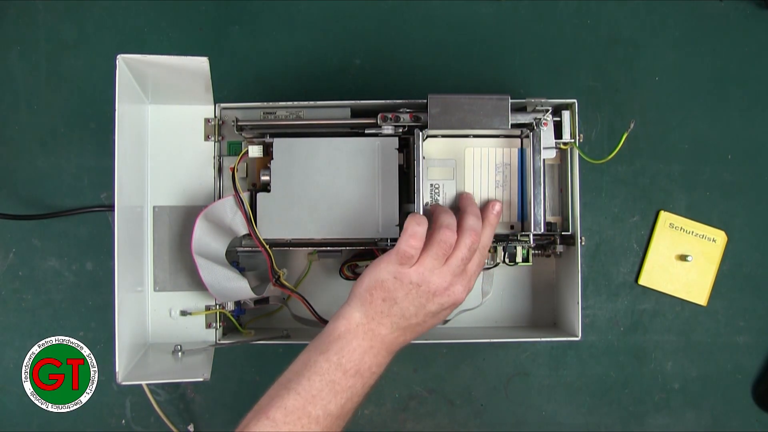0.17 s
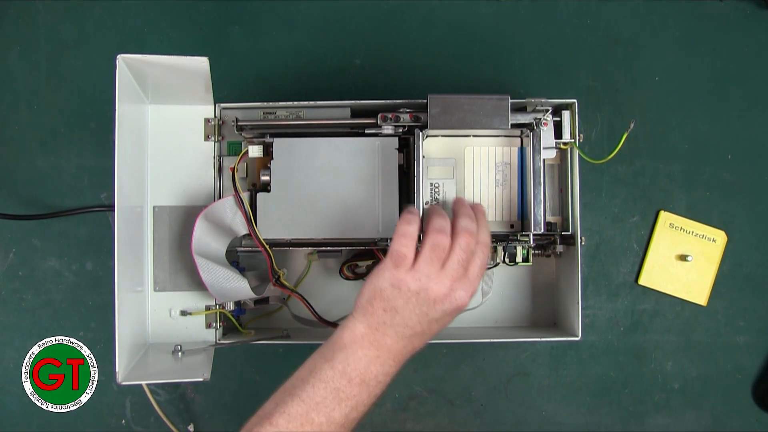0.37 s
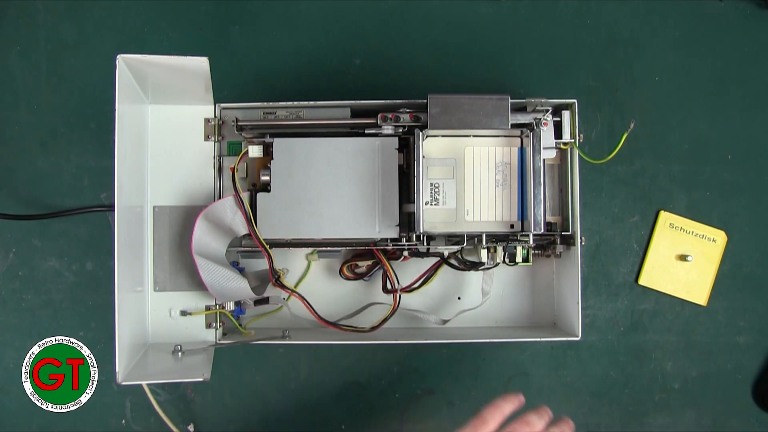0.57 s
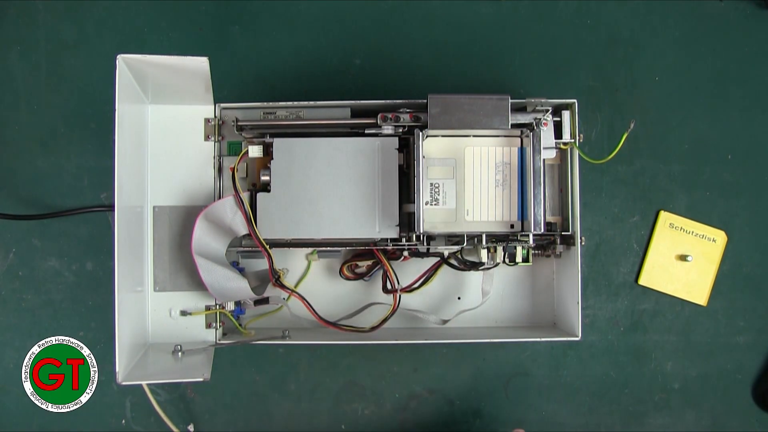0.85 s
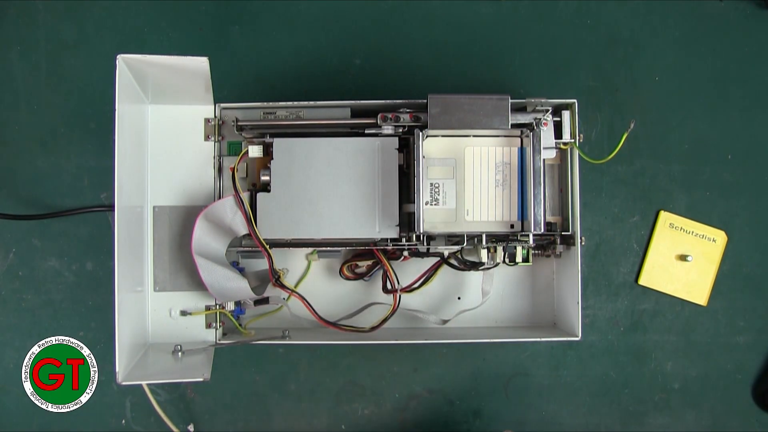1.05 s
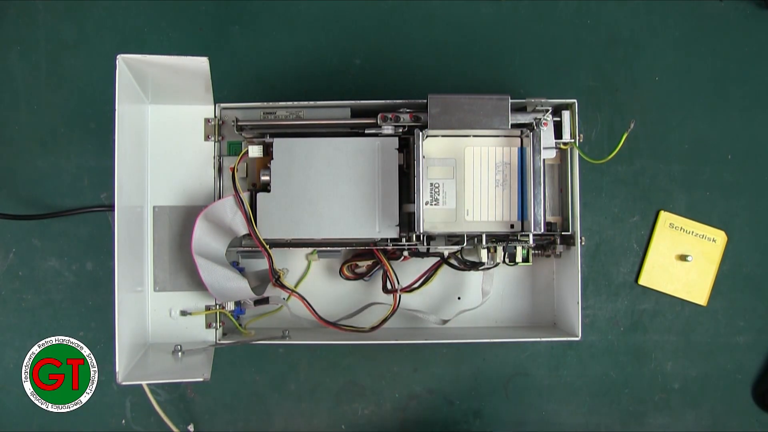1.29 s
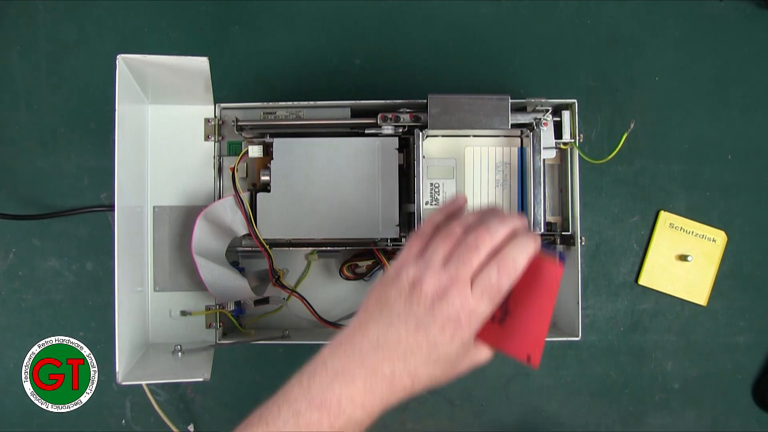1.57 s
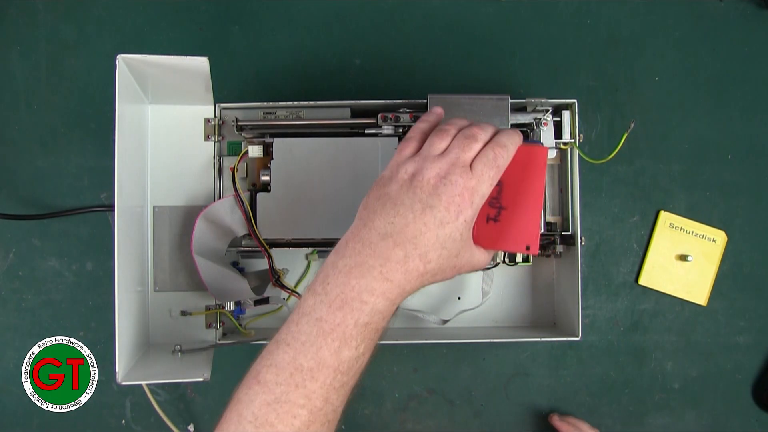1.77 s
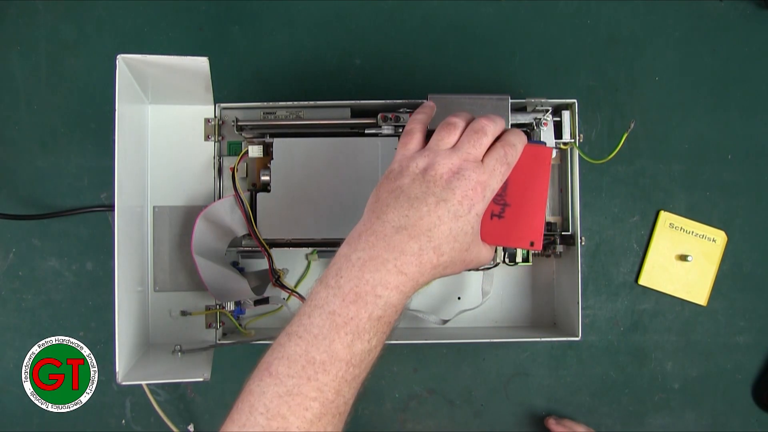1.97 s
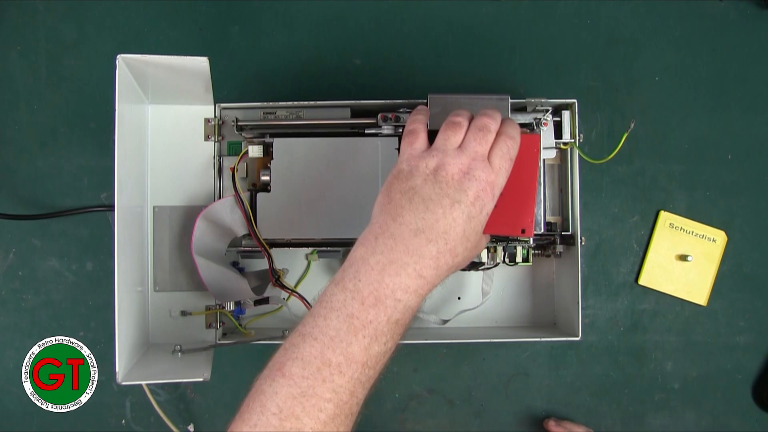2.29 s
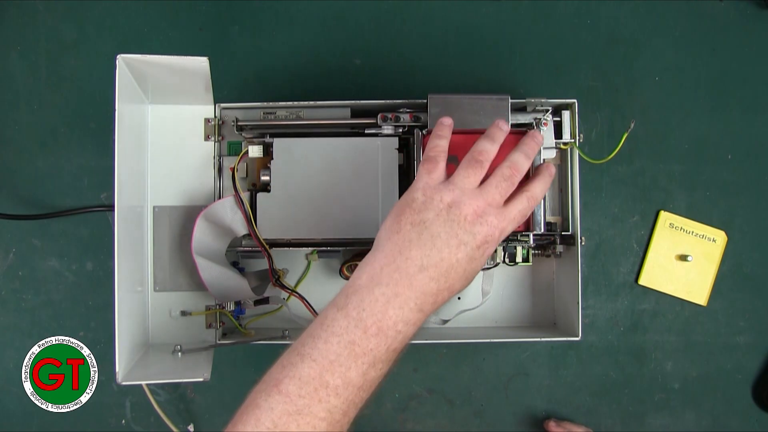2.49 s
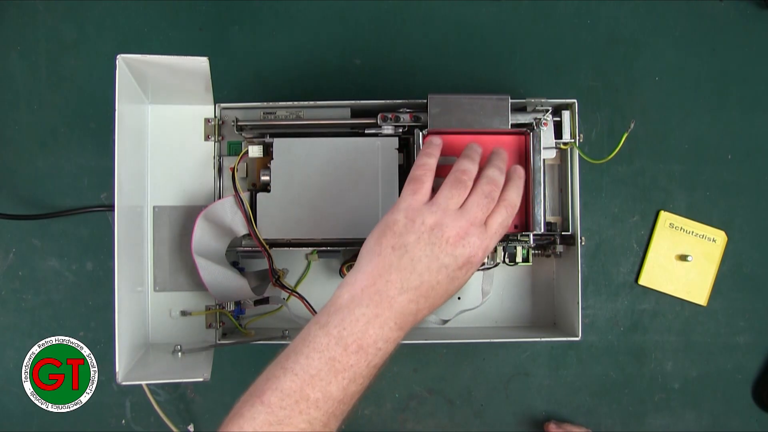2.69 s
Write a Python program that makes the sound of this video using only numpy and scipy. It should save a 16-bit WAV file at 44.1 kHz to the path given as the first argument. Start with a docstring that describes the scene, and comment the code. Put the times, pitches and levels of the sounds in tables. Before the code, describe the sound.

Stacked floppy disks knock and slap down into a metal loader, soft plastic slides follow, then a second stack rattles in with many clacks and is pushed home; close microphone above a bench, faint hum.

```python
"""In a small quiet room, over mains hum and faint hiss, a stack of plastic floppy disks is nudged by hand.
After a few knocks and thin metal pings it drops into the metal magazine of a disk loader with a slap;
a faint rising ring follows. Disks slide in grainy rubs as a second stack is picked up, which then clatters
in and is pressed home. Knocks are noise cracks with a ringing tail, shell rings and magazine modes; filtered
noise makes slides and small contacts; decaying low sines and a dull noise thud thump the bench."""
import sys
import numpy as np
from scipy import signal
from scipy.fft import rfft, irfft
from scipy.io import wavfile

SR = 44100
rng = np.random.default_rng(int(sys.argv[2]) if len(sys.argv) > 2 else 0)


def transcribe(u):
    """Save the signal u as a 16-bit wav file named by the first command-line argument.

    u: samples, shape (n,) or (channels, n), limited to [-1, 1]; the rate is SR.
    q: integer samples, one column per channel.
    """
    v = np.clip(np.atleast_2d(u).T, -1, 1)
    q = np.round(v * 32767).astype(np.int16)
    wavfile.write(sys.argv[1], SR, q)


N = 125685
CLOCK = np.arange(N) / SR  # s, the whole scene
T = np.arange(21600) / SR  # s since the start of one short sound


def amp(db):
    """Decibels to gain."""
    return 10 ** (np.asarray(db) / 20)


def unit(x):
    """Scales to rms 1."""
    return x / np.sqrt(np.mean(x ** 2) + 1e-20)


def read(points, hz):
    """Reads a table on a log-frequency axis."""
    f, value = np.transpose(points)
    return np.interp(np.log(hz + 1), np.log(f + 1), value)


def add(mix, s, sound):
    """Mixes a sound in at time s."""
    part = mix[max(round(s * SR), 0):][:len(sound)]
    part += sound[:len(part)]


def fade(t60, t=T):
    """Exponential decay by 60 dB in t60 seconds."""
    return np.exp(-np.log(1000) * t / t60)


def swing(hz):
    """A steady sine over the length of one short sound."""
    return np.sin(2 * np.pi * hz * T)


def colour(x, db_at, size=2048):
    """Causal minimum-phase filter with the gain db_at(Hz)."""
    hz = abs(np.fft.fftfreq(size, 1 / SR))
    log_gain = np.log(amp(db_at(hz)) + 1e-6)
    # The Hilbert transform of the log gain gives the minimum phase
    spectrum = np.exp(np.conj(signal.hilbert(log_gain)))
    taps = np.fft.ifft(spectrum).real
    return signal.fftconvolve(x, taps)[:len(x)]


def shaped(x, points, size=2048):
    """Colours white sound by a spectrum, keeping its power."""
    power = np.mean(amp(read(points, np.fft.rfftfreq(size, 1 / SR))) ** 2)
    return colour(x, lambda hz: read(points, hz) - 10 * np.log10(power))


def band(length, hz, width_hz):
    """Noise of rms 1 in one resonance."""
    f = np.fft.rfftfreq(length, 1 / SR)
    resonance = 1 / (1 + ((f - hz) / (width_hz / 2)) ** 2)
    return unit(irfft(rfft(rng.standard_normal(length)) * resonance, length))


# Ring-out of the case and the room. Each row: frequency in Hz, decay by 60 dB in seconds.
RING_OUT = [(100, 0.3), (600, 0.29), (1500, 0.17), (3300, 0.18), (6000, 0.2), (12000, 0.21), (16000, 0.18)]
TAIL_RISE_S = 0.0019  # the tail swells behind the crack
LATE_DB, LATE_T60_S, LATE_TOP_HZ = -32, .7, 3960  # faint long ring of the metalwork


def ring_out(size=256):
    """Dense reflections as noise, each band dying at its own speed."""
    hz, t, noise = signal.stft(rng.standard_normal(len(T)), SR, nperseg=size)
    early = fade(read(RING_OUT, hz)[:, None], t)
    late = amp(LATE_DB) * fade(LATE_T60_S, t) / (1 + (hz[:, None] / LATE_TOP_HZ) ** 6)
    tail = signal.istft(noise * (early + late), SR, nperseg=size)[1][:len(T)]
    return tail * (1 - np.exp(-T / TAIL_RISE_S))


# Mains hum. Each row: frequency in Hz, level in dB rms.
HUM = [(50, -64.5), (150, -77.5)]
# Colour of the room hiss. Each row: frequency in Hz, relative level in dB.
AIR = [(20, 6.5), (60, 1), (120, -7.5), (300, -15.5), (640, -13), (2000, -19.5), (3800, -20), (5000, -24),
       (12000, -30), (16000, -40.5)]
AIR_DB = -71.5  # rms


def background():
    """Mains hum as steady sines and the hiss of the room as coloured noise."""
    out = amp(AIR_DB) * unit(shaped(rng.standard_normal(N), AIR))
    for hz, db in HUM:
        phase = 2 * np.pi * (hz * CLOCK + rng.random())
        out += amp(db) * np.sqrt(2) * np.sin(phase)
    return out


# Faint thin ring after the hand lets go.
# Each row: frequency in Hz at the top of the swell, width in Hz, level in dB.
FRAME = [(1595, 216, -66), (2705, 2500, -70), (4840, 350, -81)]
FRAME_AT_S, FRAME_SWELL_S, GLIDE_HZ_PER_S = .56, .065, 1400


def frame():
    """Narrow and broad noise bands that swell, glide upward and fade as a faint thin ring."""
    since_peak = CLOCK - FRAME_AT_S
    swell = np.exp(-(since_peak / FRAME_SWELL_S) ** 2 / 2)
    ring = sum(amp(db) * band(N, hz, width) for hz, width, db in FRAME)
    # A rotating phase shifts every frequency by the same number of Hz
    glide = np.exp(1j * np.pi * GLIDE_HZ_PER_S * since_peak ** 2)
    return swell * (signal.hilbert(ring) * glide).real


# Slides of disk on disk.
# Each row: peak in seconds, rise and fall in seconds for a factor e, level at the peak in dB.
SLIDES = [(0.881, 0.022, 0.0045, -61.5), (0.950, 0.022, 0.018, -39), (1.225, 0.0085, 0.025, -68),
          (1.440, .012, .015, -65), (2.685, 0.052, 0.098, -62)]
# Colour of the rub. Each row: frequency in Hz, relative level in dB.
SLIDE_COLOUR = [(180, -94), (300, -53), (532, -29.5), (975, -15), (1910, -1.5), (2440, -13.5), (3270, 0),
                (4050, -11), (8190, -20), (15000, -43)]
SLIDE_GRAIN_DB, SLIDE_ROOM_DB = 3.5, -14


def slides():
    """Grainy friction of plastic on plastic, swelling and stopping."""
    level = np.zeros(N)
    for s, rise, fall, db in SLIDES:
        level += amp(db) * np.exp(-np.maximum((s - CLOCK) / rise, (CLOCK - s) / fall))
    bumps = np.minimum(rng.exponential(1, N), 5)
    grains = unit(rng.standard_normal(N) * amp(SLIDE_GRAIN_DB * bumps))
    rub = shaped(level * grains, SLIDE_COLOUR)
    room = ring_out()
    room /= np.linalg.norm(room)
    return rub + amp(SLIDE_ROOM_DB) * signal.fftconvolve(rub, room)[:N]


# Light ticks, a soft rustle and some duller small knocks, each in one resonance.
# Each row: start in seconds, level in dB, frequency in Hz, width in Hz.
SMALL_CONTACTS = [(0.102, -53.5, 7700, 1800), (0.183, -45, 3400, 600), (0.478, -56.5, 1512, 446),
                  (0.822, -62.5, 2940, 3000), (0.875, -37.5, 3440, 2580), (1.052, -60, 890, 345),
                  (1.150, -53.5, 1720, 300), (1.933, -46, 1300, 704), (2.369, -31.5, 1050, 600),
                  (2.742, -33, 766, 398)]
CONTACT_S, CONTACT_ROOM_DB = .003, -10  # decay by a factor e, level of the room's tail


def small_contacts():
    """Short dry noise bursts, each in one resonance with nothing far below it."""
    out = np.zeros(N)
    for s, db, hz, width in SMALL_CONTACTS:
        decay = np.exp(-T / CONTACT_S) + amp(CONTACT_ROOM_DB) * fade(read(RING_OUT, hz))
        rise = 1 - np.exp(-np.pi * width * T)  # a narrow resonance speaks more slowly
        contact = band(len(T), hz, width) * decay * rise
        low_cut = signal.butter(2, hz / np.sqrt(2), "high", fs=SR)
        add(out, s, amp(db) * signal.lfilter(*low_cut, contact))
    return out


# Thumps into the bench. Each row: start in seconds, level in dB.
THUMPS = [(0.0, -56), (0.136, -51.5), (0.230, -22), (1.848, -50), (2.094, -56.5), (2.257, -37),
          (2.353, -47.5), (2.456, -47), (2.515, -43.5), (2.789, -37)]
# Modes of the bench. Each row: frequency in Hz, level in dB, decay by 60 dB in seconds.
BENCH = [(81.6, 4, 0.26), (99.9, -3.5, 0.37), (190, -17.5, 0.42)]
# Dull thud of the case that goes with each thump. Each row: frequency in Hz, relative level in dB.
THUD = [(40, -14), (100, 0), (135, -12.5), (190, 3.5), (300, -15.5), (388, 1), (470, -11), (900, -28.5)]
THUMP_RISE_S, THUD_DB, THUD_T60_S = .012, -5.5, 0.17


def bench():
    """Heavy landings set the loader and the bench booming: low modes with a dull noise thud."""
    out = np.zeros(N)
    boom = sum(amp(db) * fade(t60) * swing(hz) for hz, db, t60 in BENCH)
    rise = 1 - np.exp(-T / THUMP_RISE_S)
    for s, db in THUMPS:
        noise = shaped(rng.standard_normal(len(T)), THUD, size=4096)
        thud = amp(THUD_DB) * noise * fade(THUD_T60_S)
        add(out, s, amp(db) * (boom + thud) * rise)
    return out


DETUNE = .012  # share of the frequency by which metal modes stray
# Pings of thin metal, such as shutters and springs.
# Each row: start in seconds, level in dB, frequency in Hz.
PINGS = [(0.137, -33, 1815), (0.147, -47, 8200), (0.208, -34.5, 3570)]
PING_T60_S = .2


def pings():
    """Thin metal parts, flicked in passing, buzz on as a cluster of close modes."""
    out = np.zeros(N)
    envelope = fade(PING_T60_S) * (1 - np.exp(-T / TAIL_RISE_S))
    for s, db, hz in PINGS:
        buzz = swing(hz) + .5 * band(len(T), hz, 2 * np.pi * DETUNE * hz)
        add(out, s, amp(db) * buzz * envelope)
    return out


SHELL_T60_S, SHELL_SPREAD = .085, .08  # decay at 1000 Hz, spread as a share of the pitch


def shell_ring(hz, count=6):
    """A struck disk shell: one main mode and weaker neighbours start together; higher rings die sooner."""
    near = hz * (1 + SHELL_SPREAD * rng.standard_normal((count, 1)))
    neighbours = rng.standard_normal(count) @ swing(near) / np.sqrt(count)
    dying = fade(SHELL_T60_S * np.sqrt(1000 / hz))
    return unit((swing(hz) + neighbours) * dying) * np.sqrt(np.mean(dying ** 2) / 2)


# Colour of the dense clack of plastic. Each row: frequency in Hz, relative level in dB.
CLACK = [(60, -42), (280, -21.5), (460, -13.5), (620, -1), (1100, 3.5), (1600, 0.5), (2500, 1.5), (3700, 2),
         (5000, -6), (7500, -14.5), (12000, -25), (16000, -37)]
CRACK_S, CRACK_RISE_S, TAIL_DB = 0.0044, 0.0009, -3.5  # the first crack dies fast
SAME_TAIL = 0.43  # share of the tail's power that all knocks have in common
RATTLE_DB, RATTLE_HZ, RATTLE_S = 2, 350, 0.051  # loose parts chatter just after each knock
LOW_CUT_HZ = 514  # small parts radiate little bass
TREBLE_HZ, BASS_HZ = 4900, 425  # corners of the tone controls


def knock_noise(room, linger_db):
    """A sharp crack and its dense tail, chattering in level and coloured as plastic."""
    crack = rng.standard_normal(len(T)) * np.exp(-T / CRACK_S) * (1 - np.exp(-T / CRACK_RISE_S))
    tail = np.sqrt(SAME_TAIL) * room + np.sqrt(1 - SAME_TAIL) * ring_out()
    smooth = crack + amp(TAIL_DB + linger_db) * tail
    chatter = amp(RATTLE_DB * band(len(T), 0, RATTLE_HZ) * np.exp(-T / RATTLE_S))
    return shaped(unit(smooth * chatter) * smooth.std(), CLACK)


def magazine_ring(modes):
    """The magazine's modes, struck with random signs and slightly uneven levels."""
    strikes = rng.choice([-1, 1], len(modes)) * amp(rng.normal(0, 1.0, len(modes)))
    # The shifting load detunes the modes
    return np.interp(T * rng.normal(1, DETUNE), T, strikes @ modes)


def knock(room, modes, level_db, treble_db, bass_db, magazine_db, shell_hz, shell_db, linger_db):
    """A chattering crack and its tail, the short ring of a disk shell and the magazine's modes."""
    clack = knock_noise(room, linger_db)
    magazine = amp(magazine_db + linger_db) * magazine_ring(modes)
    shell = amp(shell_db) * shell_ring(shell_hz)
    low_cut = signal.butter(6, LOW_CUT_HZ, "high", fs=SR, output="sos")
    rings = signal.sosfilt(low_cut, shell + magazine)

    def tone_db(hz):
        """Treble and bass shelves."""
        treble = treble_db * hz ** 2 / (hz ** 2 + TREBLE_HZ ** 2)
        return treble + bass_db / (1 + (hz / BASS_HZ) ** 6)

    return amp(level_db) * colour(clack + rings, tone_db)


# Knocks of disks and magazine.
# Each row: start in seconds, level in dB, treble in dB, bass in dB, magazine ring in dB,
# shell pitch in Hz, shell ring in dB, lingering share (tail and magazine) in dB.
KNOCKS = [(0.000, -32, -10.5, 7.5, -5, 1320, -24, 3.5), (0.007, -32.5, -5, -8, 7, 1343, 2, -8.5),
          (0.134, -32, -16, -16, 5.5, 2234, 0.5, -0.5), (0.146, -48, 26.5, -2, -13, 659.4, 17.5, -5.5),
          (0.193, -34, -10, -10, -5.5, 648, 3.5, 5), (0.208, -34, 10.5, 3, -22, 3550, -7, 5),
          (0.2283, -12.5, 4.5, 7, -7, 1080, -13, -6), (0.2301, -3.5, -5, 5.5, 6, 3857, -9, -22.5),
          (0.242, -18, 1.5, 13.5, -4, 1060, -24, 0), (1.8461, -24.5, -8, -3, -5.5, 2660, -3, 2.5),
          (1.850, -21, -11.5, -2.5, 1.5, 679, -3.5, -3.5), (2.012, -30, -34.5, -15, -2.5, 1990, 3.5, 2),
          (2.065, -21, 2.5, 8, -11, 3320, -32, -6), (2.1195, -26, -21.5, -2, -6, 1136, 6, 0.5),
          (2.181, -22.5, -17.5, -6, -45, 1067, -3, 6.5), (2.186, -26.5, -11, 20, 0.5, 2330, 13, -10),
          (2.1952, -17, -14, -4, -0.5, 1115, 2, 0), (2.213, -32, -16, 3.5, -5, 1034, 7, 8),
          (2.258, -17.5, -1, -20, -5.5, 1097, -3, -4.5), (2.277, -26, 2.5, -11, 12, 1155, 0.5, -10.5),
          (2.294, -29, -21, 11, -2, 1023, 5.5, -28), (2.333, -34.5, -12, 9, -5.5, 3590, 3, 6),
          (2.349, -37, -9, -18, 3, 1026, 2, 2), (2.427, -20, -13.5, -9.5, -10.5, 1065, -3.5, 1),
          (2.446, -15.5, -10, -5.5, -0.5, 1362, -5, -2), (2.4523, -13, -6.5, -17, 1.5, 1903, -5, -12.5),
          (2.457, -16, 7, 4.5, -4, 654, -4, -7), (2.518, -30, -2.5, 8.5, -12, 876, 0, 3),
          (2.5215, -32, -4, 16, -8.5, 3206, 14, 1.5), (2.533, -41, -5, -8, -10, 2120, 13, -5),
          (2.546, -33, -2, 12, 7, 928, 8, -1), (2.553, -51, 3, -5, -11, 1967, 25.5, -25),
          (2.571, -34.5, -9, -2.5, -3.5, 1900, 0, 4), (2.588, -36.5, 11.5, -6, 12, 3040, -9, -15.5),
          (2.77, -37, -11.5, 8, -7, 2190, 5, 4.5), (2.787, -42, -7.5, -5, -34, 788, 12.5, 14),
          (2.7924, -20.5, -4.5, 25, -16, 796, -17.5, -14.5)]
# Modes of the magazine and its frame. Each row: frequency in Hz, level in dB, decay by 60 dB in seconds.
MAGAZINE = [(569, -13.5, 0.14), (661, -6.5, 0.19), (743.6, -14.5, .2), (782, -12.5, 0.083),
            (900, -16, 0.17), (1075, -15.5, .19), (1252, -15, 0.21), (1850, -13.5, .24), (1965, -17, 0.13),
            (2272, -10, .19), (2240, -17, .15), (2647, -11, .25), (3360, -15, .23), (3600, -18, 0.28)]


def clatter():
    """All knocks ring the same magazine in the same room."""
    out, room = np.zeros(N), ring_out()
    modes = np.array([amp(db) * fade(t60) * swing(hz) for hz, db, t60 in MAGAZINE])
    for s, *row in KNOCKS:
        add(out, s, knock(room, modes, *row))
    return out


def scene():
    """Everything at one microphone above the bench."""
    handling = frame() + slides() + small_contacts()
    landing = bench() + pings() + clatter()
    return (background() + handling + landing)[None]


EDGE_HZ = 16100  # top of the recorded band


def record(dry):
    """Full-scale limit, then the band limit."""
    taps = signal.firwin(511, EDGE_HZ, window=("kaiser", 9), fs=SR)
    return signal.oaconvolve(np.clip(dry, -1, 1), taps[None], "same")


dry = scene()
out = record(dry)
transcribe(out)
```